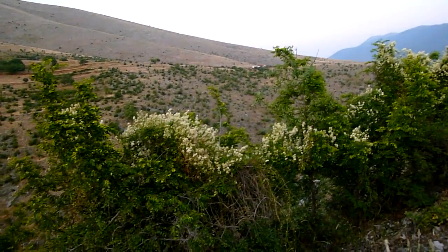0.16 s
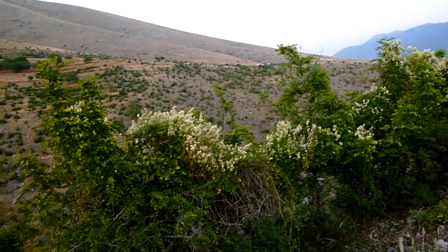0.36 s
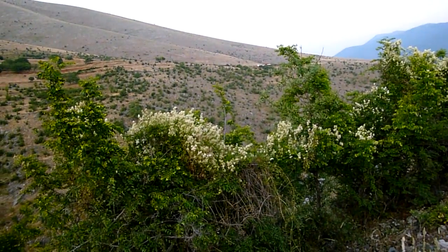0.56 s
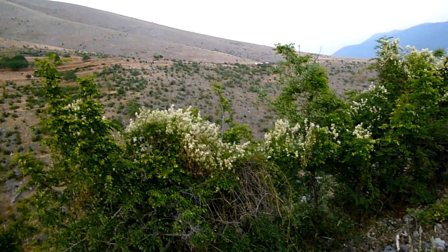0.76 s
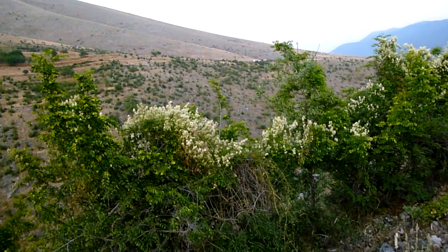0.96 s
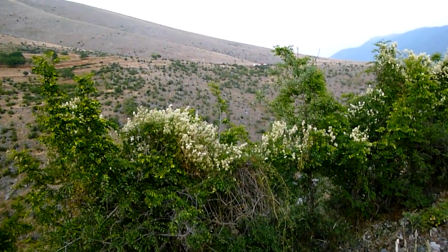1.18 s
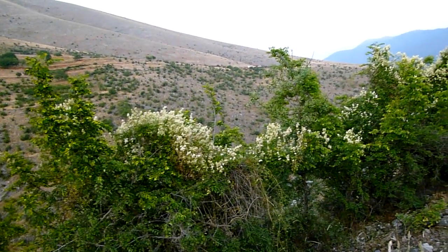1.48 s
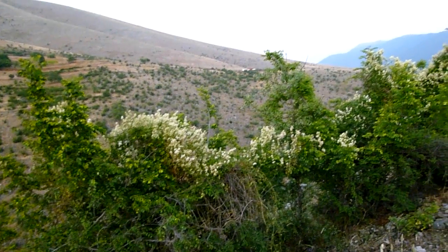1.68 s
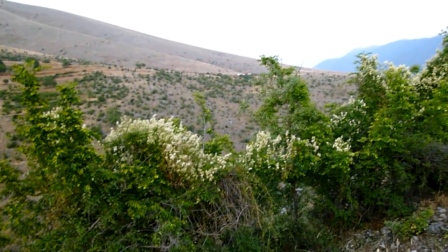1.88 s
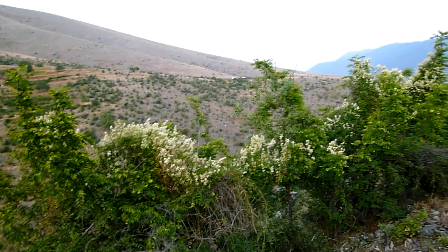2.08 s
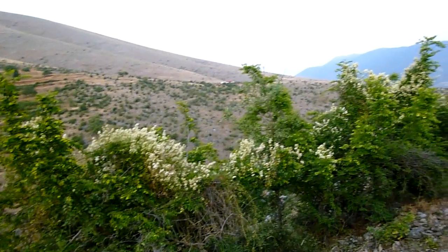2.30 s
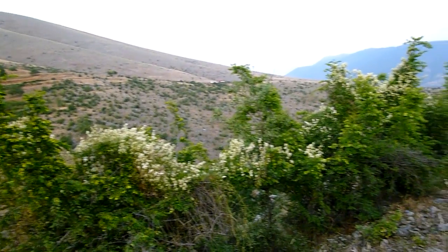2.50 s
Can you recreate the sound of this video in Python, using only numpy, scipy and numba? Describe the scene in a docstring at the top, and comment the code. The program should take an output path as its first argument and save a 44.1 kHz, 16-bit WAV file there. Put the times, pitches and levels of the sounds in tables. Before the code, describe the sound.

Low, fluttering wind rumble overloads a small outdoor microphone, with one hard knock, a faint high double bell clink beneath the gusts, and soft far bell tones as it dies down to quiet air hiss.

```python
"""Air hisses steadily and a far bell sounds faintly: shaped noise, and decaying sines.
From 0.2 s gusts buffet a small camera's microphone, each eddy one soft pressure pulse; a hard bump hits at 0.7 s.
A small bell, a set of ringing modes, clinks near 1.0 and 1.2 s; far bells return after 2 s as the wind eases.
Throughout, the camera's notches hollow the treble and its gain control ducks the hiss under the gusts."""
import sys
import numpy as np
from scipy import signal
from scipy.fft import rfft, irfft
from scipy.io import wavfile
from scipy.ndimage import uniform_filter1d
from numba import njit

SR = 44100
rng = np.random.default_rng(int(sys.argv[2]) if len(sys.argv) > 2 else 0)


def digitize_waveform(pressure):
    """Quantize a signal to 16-bit integers and store it at the path in sys.argv[1].

    Rows of a 2-D input are taken as channels; values are limited to [-1, 1].
    """
    field = np.atleast_2d(pressure).T
    bounded = np.clip(field, -1, 1)
    quanta = np.round(bounded * 32767).astype(np.int16)
    wavfile.write(sys.argv[1], SR, quanta)


N = 116865


def undb(db):
    """Decibels to amplitude gain."""
    return 10 ** (np.asarray(db) / 20)


def unit(x):
    """Scale to rms 1."""
    return x / np.sqrt(np.mean(x ** 2))


def cut(x, hz, kind, order=2):
    """Butterworth low-pass or high-pass."""
    return signal.sosfilt(signal.butter(order, hz, kind, fs=SR, output="sos"), x)


def noise():
    """White Gaussian noise."""
    return rng.standard_normal(N)


def smooth(x, size):
    """Moving average, applied twice."""
    return uniform_filter1d(uniform_filter1d(x, size), size)


def walk(steps_per_s):
    """Smoothed random steps, spread near 1."""
    k = int(SR / steps_per_s)
    steps = np.repeat(rng.standard_normal(N // k + 1), k)
    return unit(smooth(steps, k)[:N])


def thumps(rows, width_rad):
    """Suction pulses with a rebound on either side; rows (time [s], level [dB], sharpness [Hz])."""
    out = np.zeros(N)
    for s, db, hz in rows:
        first = max(int((s - 4 / hz) * SR), 0)
        last = min(int((s + 4 / hz) * SR), N)
        i = np.arange(first, last)
        phase = 2 * np.pi * hz * (i / SR - s)
        out[i] -= undb(db) * np.cos(phase) / np.cosh(phase / width_rad)
    return out


def ring(s, modes, attack_s):
    """Exponentially decaying sines from time s; modes (frequency [Hz], level [dB], t60 [s])."""
    age = np.maximum(np.arange(N) / SR - s, 0)
    tones = np.zeros(N)
    for hz, db, t60_s in modes:
        tones += undb(db) * np.sin(2 * np.pi * hz * age) * np.exp(-np.log(1000) * age / t60_s)
    return tones * np.minimum(age / attack_s, 1)


# hiss spectrum of air and microphone: (frequency [Hz], relative density level [dB])
AIR_SPECTRUM = [(30, -12), (100, 12.5), (300, 4), (600, 0), (900, -1), (1400, -5), (2200, -8.5),
                (4200, -12.5), (6500, -17), (10000, -21), (13300, -24.5), (15500, -30)]
AIR_DB, AIR_WAVER_DB, AIR_FLICKER_DB = -50.5, -0.3, -0.84


def air():
    """Shaped noise wavers a little in level; its part below about 2.5 kHz also flickers on its own."""
    hz, db = np.array(AIR_SPECTRUM).T
    f = np.maximum(np.arange(N // 2 + 1) * SR / N, 1)
    shape = undb(np.interp(np.log(f), np.log(hz), db))
    hiss = unit(irfft(rfft(noise()) * shape, N))
    low = cut(hiss, 2500, "low", order=1)
    high = hiss - low
    flickering = high + low * undb(AIR_FLICKER_DB * walk(11))
    return flickering * undb(AIR_DB + AIR_WAVER_DB * walk(5.685))


# tones of farther bells: (time [s], frequency [Hz], level [dB])
FAR_TONES = [(.06, 1410, -63), (2.01, 1365, -55), (2.22, 4552, -66)]
FAR_ATTACK_S, FAR_T60_S = 0.015, 1


def far_bells():
    """Each far stroke arrives as one soft-edged decaying mode."""
    return sum(ring(s, [(hz, db, FAR_T60_S)], FAR_ATTACK_S) for s, hz, db in FAR_TONES)


# bell strokes: (time [s], level [dB])
STROKES = [(.998, 0), (1.195, -12)]
# small bell modes: (frequency [Hz], level [dB], t60 [s])
BELL_MODES = [(3458, -52, .8), (3576, -58.5, .8), (4470, -72, .5), (6465, -51, .23), (7063, -68, .3),
              (9560, -67, .2), (9998, -65, .25)]
RING_ATTACK_S = 0.002
CLAPPER_DB, CLAPPER_DECAY_S = -66, 0.01


def small_bell():
    """The clapper makes a short noise tick and sets the bell's modes ringing."""
    t = np.arange(N) / SR
    band = cut(cut(noise(), 3200, "high"), 7000, "low")
    clapper = undb(CLAPPER_DB) * unit(band)
    out = np.zeros(N)
    for s, db in STROKES:
        tick = clapper * (t >= s) * np.exp(-np.abs(t - s) / CLAPPER_DECAY_S)
        out += undb(db) * (ring(s, BELL_MODES, RING_ATTACK_S) + tick)
    return out


BASS_CUT_HZ = 57
BUMP_S, BUMP_DB, BUMP_HZ, BUMP_WIDTH_RAD = 0.7033, 5.5, 227, 0.9
KNOCK_DB, KNOCK_HZ = -27, 950  # hard edge
CRACK_DB, CRACK_DECAY_S = -40, 0.0007  # dry tick


def bump():
    """A hard pressure pulse, a sharper one at the same instant and a tick of low-passed noise."""
    pulses = [(BUMP_S, BUMP_DB, BUMP_HZ), (BUMP_S, KNOCK_DB, KNOCK_HZ)]
    body = cut(thumps(pulses, BUMP_WIDTH_RAD), BASS_CUT_HZ, "high")
    age = np.arange(N) / SR - BUMP_S
    tick = unit(cut(noise(), 2000, "low", order=1)) * np.exp(-np.abs(age) / CRACK_DECAY_S)
    return body + undb(CRACK_DB) * tick


# wind strength at the microphone: (time [s], level [dB])
GUST_LEVEL = [(0, -52), (0.08, -73), (0.14, -37.5), (0.2, -37.5), (0.23, -21.5), (0.33, -48.5), (0.39, -21),
              (0.41, -38.5), (0.46, -15.5), (0.52, -23.5), (0.56, -17.5), (0.68, -20), (0.8, -13.5),
              (0.86, -23.5), (0.92, -16), (0.96, -20.5), (1.03, -14), (1.06, -24), (1.1, -17.5),
              (1.17, -22.5), (1.24, -18.5), (1.41, -15), (1.49, -35.5), (1.54, -19.5), (1.66, -19),
              (1.715, -32), (1.75, -21), (1.8, -37.5), (1.86, -22.5), (1.95, -38), (2, -26.5), (2.03, -25),
              (2.07, -21), (2.12, -26), (2.2, -33), (2.25, -24), (2.37, -25.5), (2.42, -52), (2.46, -37.5),
              (2.49, -59), (2.56, -75.5), (2.61, -38.5), (2.65, -54)]
FULL_GUST_DB = -20  # reference strength for eddy size and swirl


def gust_level_db():
    """Wind strength, interpolated linearly in dB."""
    return np.interp(np.arange(N) / SR, *np.array(GUST_LEVEL).T)


RUMBLE_HZ, RUMBLE_DB, RUMBLE_DB_PER_GUST_DB = 102, -27, 0.68


def swirl(gust_db):
    """Slow turbulence: low-frequency noise whose level follows the gust."""
    rumble = cut(noise(), RUMBLE_HZ, "low", order=3)
    rumble = unit(cut(rumble, BASS_CUT_HZ, "high", order=3))
    return rumble * undb(RUMBLE_DB + RUMBLE_DB_PER_GUST_DB * (gust_db - FULL_GUST_DB))


PULSE_WIDTH_RAD = 1.508
EDDIES_PER_S, EDDY_HZ, EDDY_SPREAD_OCT = 190, 164.4, 0.35
EDDY_SCATTER_DB, EDDY_DB = 5.5, -0.5
OCTAVES_PER_DB = 0.074  # harder wind makes shorter eddies


def small_eddies(gust_db):
    """A stream of scattered pulses, evened out in local power, then set to the gust level."""
    count = int(EDDIES_PER_S * N / SR)
    time_chance, pitch_chance, level_chance = rng.standard_normal((count, 3)).T
    times = (np.arange(count) + 0.5 * time_chance) / EDDIES_PER_S
    gust_at_eddy = np.interp(times, np.arange(N) / SR, gust_db)
    octaves = OCTAVES_PER_DB * (gust_at_eddy - FULL_GUST_DB) + EDDY_SPREAD_OCT * pitch_chance
    # the spread is an exponent of 2, as is the gust's share
    rows = zip(times, EDDY_SCATTER_DB * level_chance, EDDY_HZ * 2 ** octaves)
    eddies = cut(thumps(rows, PULSE_WIDTH_RAD), BASS_CUT_HZ, "high")
    local_rms = np.sqrt(smooth(eddies ** 2, 1200) + 1e-9)
    return eddies / local_rms * undb(gust_db + EDDY_DB)


# strongest eddies: (time [s], level [dB], sharpness [Hz])
STRONG_EDDIES = [(0.2205, -23.5, 230), (0.2285, -22.5, 175), (0.241, -26.5, 180), (0.3837, -15.5, 140),
                 (0.4295, -6.5, 161.4), (0.4401, -5, 203), (0.4745, -7.5, 157.4), (0.4852, -11, 199),
                 (0.5484, -10, 244), (0.5903, -6, 212), (0.6175, -5.5, 170), (0.6253, -13.5, 140.5),
                 (0.6629, -3.5, 180), (0.6684, -6, 173), (0.7385, -1.5, 160), (0.7661, -11, 226),
                 (0.7768, -11, 241), (0.7986, -7.5, 363), (0.8123, -9.5, 232), (0.8353, -9, 230),
                 (0.873, -11, 220), (0.9037, -6, 198), (0.9318, -2.5, 210), (1.0106, -2, 292),
                 (1.0186, -5.5, 228), (1.0327, -9, 205), (1.0782, -4, 200), (1.0898, 0.5, 241),
                 (1.219, -9, 250), (1.2241, -2, 235), (1.2356, -1.5, 179), (1.2522, -6, 224),
                 (1.316, -12.5, 284), (1.3505, -4, 294), (1.3673, -9, 190), (1.3797, -8.5, 250),
                 (1.4012, -12.5, 205), (1.5332, -4.5, 136), (1.564, -15, 295), (1.6058, -7.5, 148),
                 (1.6246, -17, 169), (1.6897, -2, 193), (1.8699, -12.5, 151), (2.002, -20.5, 230),
                 (2.0525, -7.5, 149.3), (2.064, -14, 234), (2.0754, -11.5, 182), (2.088, -17, 210),
                 (2.103, -15, 275), (2.1428, -13, 160), (2.1561, -10, 187), (2.1722, -10, 176),
                 (2.2379, -11, 182), (2.258, -17.5, 220), (2.2847, -14.5, 206), (2.3086, -7.5, 179),
                 (2.3184, -15, 177), (2.3511, -12, 189)]


def buffets():
    """Each strong eddy is one pressure pulse at its own time, level and sharpness."""
    return cut(thumps(STRONG_EDDIES, PULSE_WIDTH_RAD), BASS_CUT_HZ, "high")


def wind():
    """Small eddies and swirl follow the gust; strong buffets are added."""
    gust_db = gust_level_db()
    return small_eddies(gust_db) + swirl(gust_db) + buffets()


def scene():
    """Sum of all sources at the microphone."""
    return (wind() + bump() + small_bell() + far_bells() + air())[None]


@njit
def follow(x, attack, release):
    """One-pole level follower, fast up and slow down; attack and release are fractions per sample."""
    out, e = np.empty(len(x)), 0.
    for i in range(len(x)):
        e += (abs(x[i]) - e) * (attack if abs(x[i]) > e else release)
        out[i] = e
    return out


# camera notch filters: (frequency [Hz], width [Hz])
CAMERA_NOTCHES = [(2990, 1340), (5200, 890), (11640, 2000)]
AGC_ATTACK_S, AGC_RELEASE_S = 0.03, 0.45
AGC_THRESHOLD_DB, AGC_CUT_DB_PER_DB = -22.3, 0.57
TOP_HZ = 15700


def record(dry):
    """Camera chain: notches, gain cut above a level threshold, steep treble cut-off."""
    x = dry[0]
    for hz, width_hz in CAMERA_NOTCHES:
        x = signal.lfilter(*signal.iirnotch(hz, hz / width_hz, fs=SR), x)
    level = follow(x, 1 / (AGC_ATTACK_S * SR), 1 / (AGC_RELEASE_S * SR))
    excess = np.maximum(level / undb(AGC_THRESHOLD_DB), 1)
    x = x * excess ** -AGC_CUT_DB_PER_DB
    return signal.sosfilt(signal.ellip(10, 0.2, 60, TOP_HZ, fs=SR, output="sos"), x)[None]


dry = scene()
out = record(dry)
digitize_waveform(out)
```